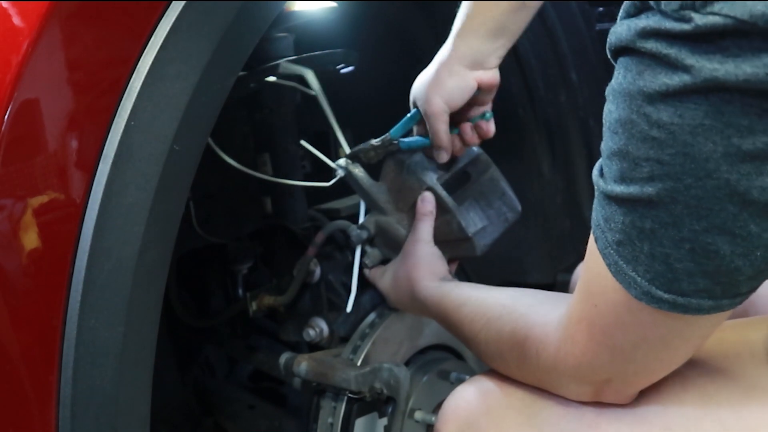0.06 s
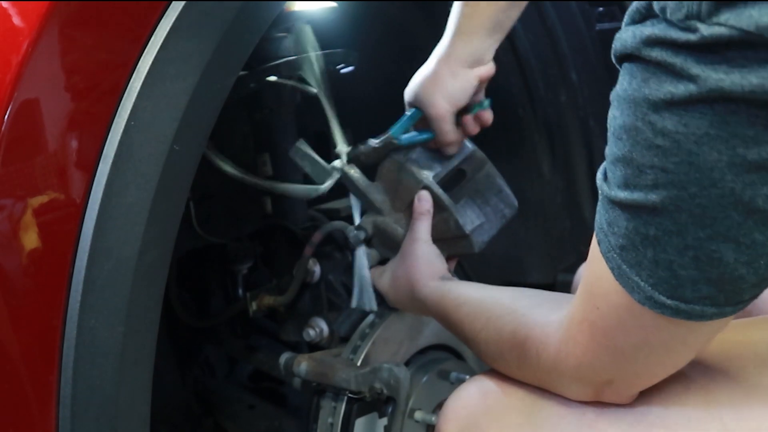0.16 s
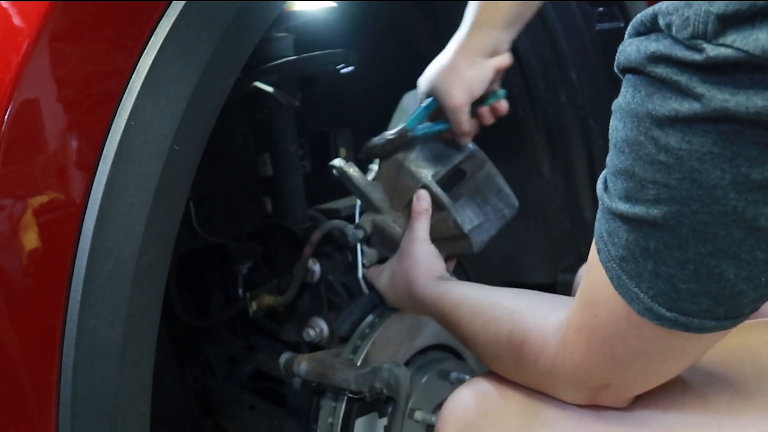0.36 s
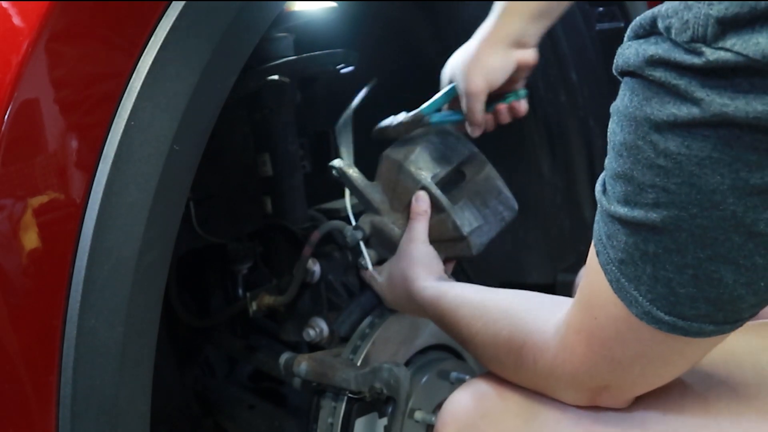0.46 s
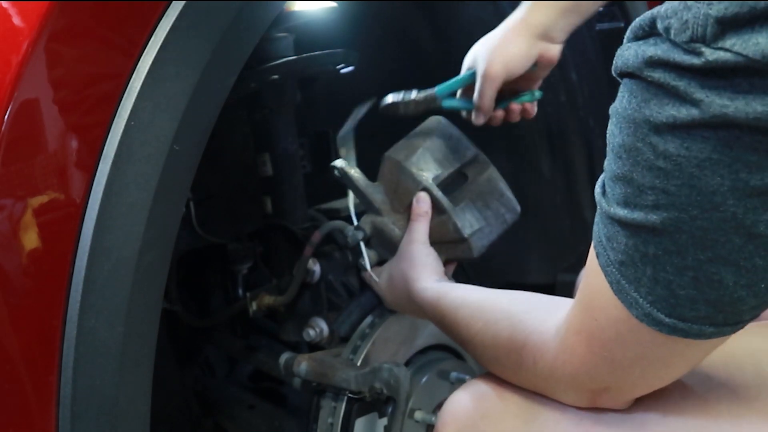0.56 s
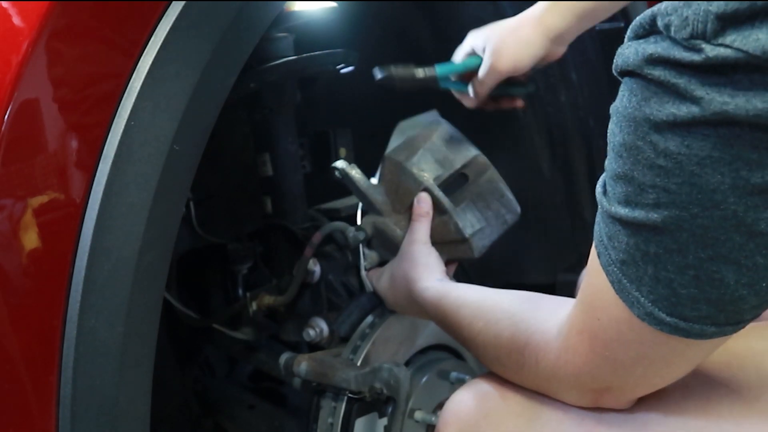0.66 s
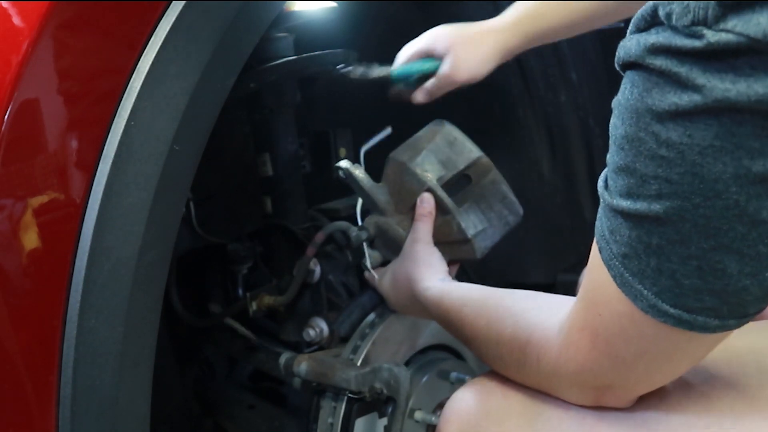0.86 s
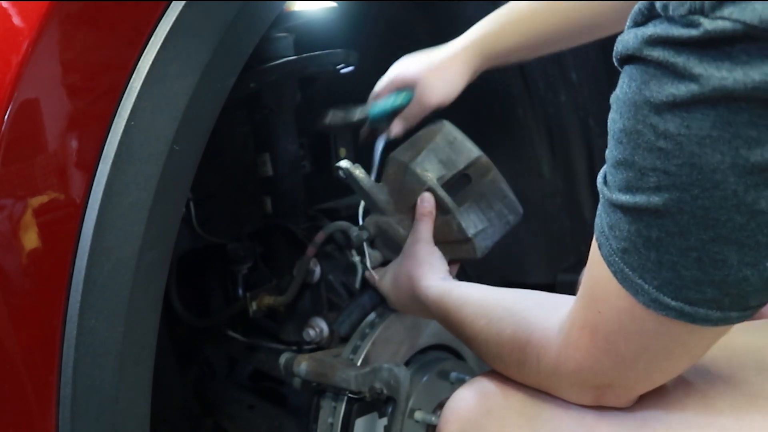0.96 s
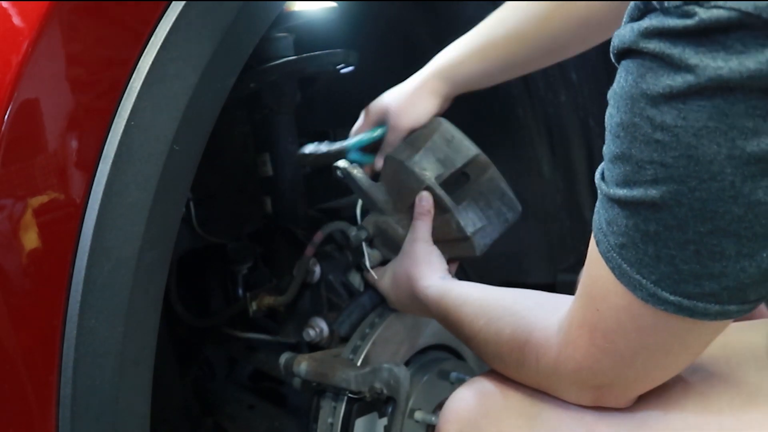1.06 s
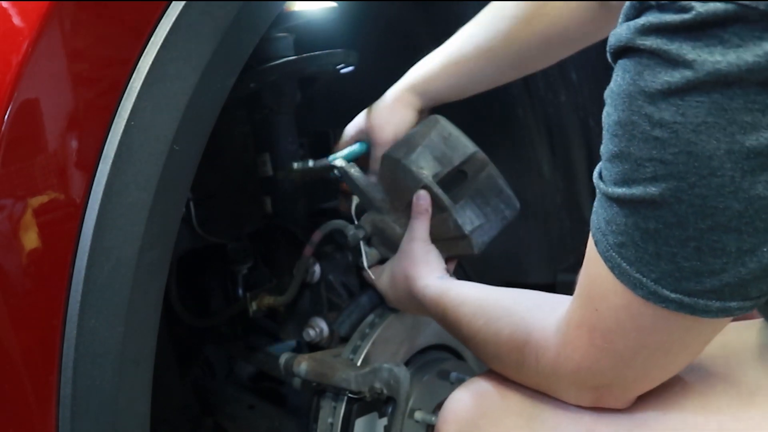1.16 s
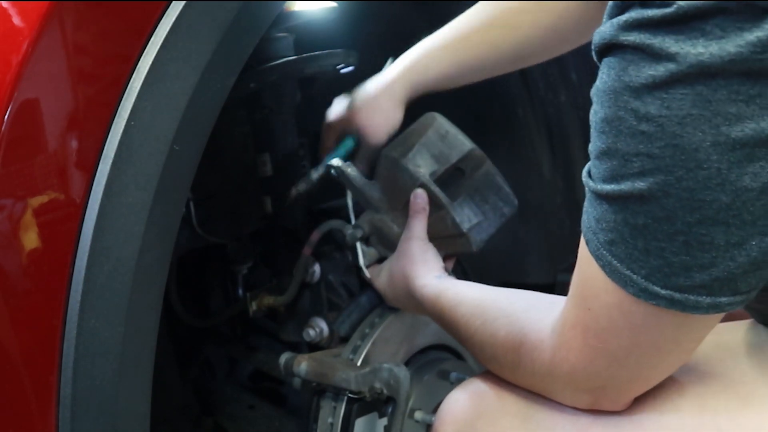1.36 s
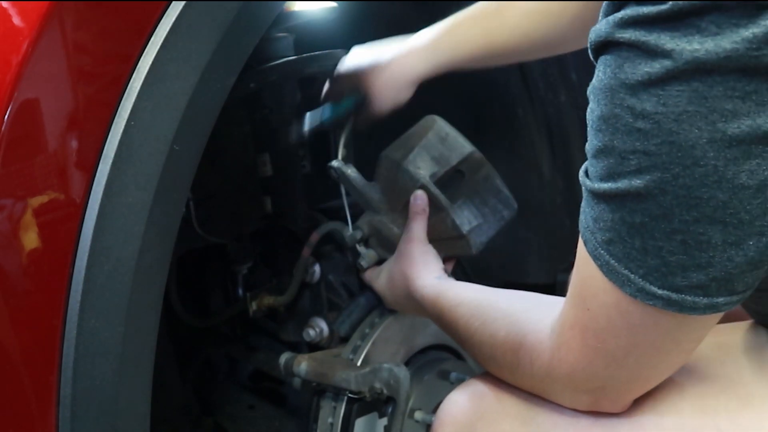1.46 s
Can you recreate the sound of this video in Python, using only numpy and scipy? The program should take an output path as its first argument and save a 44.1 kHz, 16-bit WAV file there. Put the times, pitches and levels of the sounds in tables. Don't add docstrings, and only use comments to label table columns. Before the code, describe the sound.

Close up in a garage wheel arch, a sharp steel snip rings out and fades, then a quieter slap on a plastic liner, faint clicks, a soft metal knock and light rubbing over low room air.

```python
import sys
import numpy as np
from scipy import signal
from scipy.fft import rfft, irfft
from scipy.io import wavfile
from scipy.ndimage import uniform_filter1d

SR = 44100
rng = np.random.default_rng(int(sys.argv[2]) if len(sys.argv) > 2 else 0)


def store_wav(level_fs):
    pcm = np.round(np.clip(np.atleast_2d(level_fs), -1, 1) * 32767)
    wavfile.write(sys.argv[1], SR, pcm.T.astype(np.int16))


def undo_db(level):
    steps = np.asarray(level, float) / 20
    return 10 ** steps


N = 66150

# frequency in Hz, level in dB.
AIR_COLOUR = [(20, -31), (60, -8.5), (125, -6.5), (300, -4.5), (600, -16.5), (1500, -20.5), (4000, -28.5),
              (16000, -47)]
# time in seconds, level in dB.
DRONE_LEVEL = [(0.0, -67), (0.102, -61), (0.174, -84.5), (0.229, -54.5), (0.262, -60.5), (0.384, -86.5),
               (0.458, -75), (0.504, -66), (0.63, -75), (0.688, -65.5), (1.229, -73.5), (1.306, -61.5),
               (1.466, -65.5), (1.5, -73.5)]
# time in seconds, level in dB.
RUB_LEVEL = [(0, -84.5), (.15, -81.5), (.2, -75.5), (0.501, -81.5), (.7, -84.5), (.95, -81), (1.079, -79),
             (1.12, -74.5), (1.17, -68), (1.2, -80.5), (1.3, -80), (1.5, -76)]
# frequency in Hz, level in dB.
RUB_COLOUR = [(900, -10), (3000, 2), (7000, -8.5), (12000, -5), (16000, -7.5)]
# start in seconds, level in dB, chatter
# fade in seconds.
SNIP = [
    (.2276, 3, .009),
    (.2292, -11, .03),
    (.2322, -13, .014),
    (.2405, -26, .03),
]
# frequency in Hz, level in dB.
SNIP_COLOUR = [(1000, -35), (1700, -16), (2150, 2), (2900, -11), (3700, -6), (7000, -9.5), (10000, -4.5),
               (16500, -7.5)]
# pitch in Hz, level in dB, fade in seconds.
JAW_MODES = [(2156, -3.5, 0.022), (2460, 1, 0.027), (3613, -3.5, 0.02), (5360, 0.5, 0.025),
             (5590, -4, 0.06), (7050, -10.5, 0.022), (8360, -2.5, 0.037), (9300, -6, 0.019),
             (9725, -6, 0.031), (10280, 1, .018), (10780, -3.5, 0.054), (13780, -2, 0.0083),
             (14200, -3.5, .022), (15680, -8.5, .025)]
# start in seconds, level in dB,
# pitch in Hz, fade in seconds.
PINGS = [(.2277, -15, 12800, .005), (.2277, -22, 16200, .012), (.228, -36, 320, .04),
         (.2558, -31, 2800, .005), (.24, -38, 2300, .3), (.24, -40, 2425, .3), (.24, -42, 5400, .25),
         (.24, -42, 5800, .2), (.4330, -24, 1620, .03), (.4395, -29, 1530, .07), (.4330, -33, 628, .08),
         (.434, -37, 395, .08), (.438, -48, 105, .25), (.436, -43, 4650, .05), (.797, -48, 555, .06),
         (.798, -48, 385, .08), (.803, -54, 680, .06), (.93, -74, 5500, .45), (.4332, -37, 1195, .07),
         (.4338, -33, 1840, .06), (.4345, -35, 2140, .07), (.4352, -32, 2550, .05),
         (.4365, -29, 2860, .045), (.4355, -33, 3250, .04), (.4345, -36, 3700, .06), (.466, -45, 750, .07),
         (.444, -40, 250, .09), (.475, -49, 350, .1), (.604, -61, 6300, .04), (.6045, -62, 8300, .04),
         (.801, -55, 9780, .03), (.802, -54, 11700, .025), (.8025, -52, 5790, .03), (.801, -46, 2580, .08),
         (.802, -50, 3335, .06), (.805, -48, 1455, .09), (.807, -47, 1960, .09), (.808, -48, 2930, .08),
         (1.15, -79, 3530, .2), (1.2855, -53, 2950, .04), (1.477, -68, 3450, .03), (1.477, -68, 3800, .03)]
# centre in seconds, level in dB, width in seconds.
PUFFS = [
    (0.2281, -22, 0.00032),
    (.256, -30.5, .00012),
]
# frequency in Hz, level in dB.
WASH_COLOUR = [(1700, -23.5), (2300, -0.5), (2900, -6.5), (4800, -10), (5650, -5), (6500, -13),
               (10000, -10.5), (16000, -16)]
# frequency in Hz, fade in seconds.
WASH_FADE = [(2100, .35), (5500, .36), (10000, .31), (15000, 0.25)]
# start in seconds, level in dB, chatter fade in seconds.
SLAP = [
    (.4328, -21, 0.034),
    (.4358, -16.5, 0.013),
    (.4383, -24.5, 0.015),
    (.44, -33, 0.3),
    (.447, -60, 0.047),
    (.469, -51, 0.014),
]
# frequency in Hz, level in dB.
SLAP_COLOUR = [(40, -55), (110, -16), (250, -11), (1200, -5), (3400, -2.5), (5500, -12.5), (9000, -20.5),
               (16000, -34)]
# pitch in Hz, level in dB, fade in seconds.
LINER_MODES = [(257, -11, 0.12), (388, 7, 0.076), (664, -15, 0.094), (1190, -4, 0.031),
               (1646, -12.5, 0.027), (1848, 4, 0.15), (2146, -6, 0.055), (2550, -14, 0.094),
               (2820, -7, 0.048), (3200, -3, 0.072), (3680, -8, 0.082), (4400, -15, 0.076),
               (4600, -19, 0.077)]
# frequency in Hz, fade in seconds.
GARAGE_FADE = [(200, 0.2), (800, 0.66), (2100, 0.35), (5500, 0.26), (15000, 0.047)]
# start in seconds, level in dB, chatter fade in seconds, ring pitch in Hz,
# ring share in dB.
TICKS = [(0.492, -45.5, 0.038, 8000, -7), (0.598, -58.5, 0.038, 4600, -2), (0.603, -61, 0.084, 3180, 7),
         (0.623, -60.5, 0.14, 3080, -3.5), (.675, -70, 0.05, 3500, 3), (.749, -64.5, 0.066, 2700, 8),
         (0.855, -55.5, 0.07, 3550, -22), (0.894, -52, 0.07, 3720, -29.5), (0.9191, -60, 0.026, 9700, -5),
         (0.922, -54, 0.1, 3950, -1.5), (0.95, -65, 0.047, 5400, -1), (1.0097, -57, 0.059, 2784, -5.5),
         (1.066, -64.5, 0.073, 3080, -9), (1.23, -71, 0.061, 2720, 4.5), (1.264, -67, 0.045, 3000, 5),
         (1.274, -69.5, 0.13, 2950, 14), (1.2842, -56.5, 0.051, 3240, 7.5), (1.304, -59.5, 0.12, 3270, -2),
         (1.439, -60.5, 0.033, 3880, -14.5)]
# frequency in Hz, level in dB.
TICK_COLOUR = [(500, -6), (1500, -3.5), (3500, 6), (7000, -5), (16000, -8.5)]
# ratio to the ring pitch, level in dB.
TICK_OVERTONES = [(2.0, -20)]
# start in seconds, level in dB, chatter fade in seconds.
KNOCK = [
    (.7965, -35.5, 0.092),
    (.8035, -30.5, 0.058),
    (.81, -48.5, 0.44),
    (.8145, -39, 0.016),
    (.819, -42, 0.053),
]
# frequency in Hz, level in dB.
KNOCK_COLOUR = [(150, -44), (380, -2), (900, -11), (1500, -2), (3000, -0.5), (4800, -13), (8000, -18.5),
                (16000, -31)]
# pitch in Hz, level in dB, fade in seconds.
CASTING_MODES = [(375, 2, 0.028), (570, 0.5, 0.24), (1470, -9, 0.07), (1990, 2, 0.034), (2450, -7, 0.046),
                 (2620, 2, 0.077), (2830, -13, 0.11), (3300, -12, 0.095), (3780, -10, 0.027)]


def rms_one(x):
    return x / np.sqrt(np.mean(x ** 2) + 1e-20)


def at_hz(points, hz):
    table = np.array(points)
    return np.interp(np.log(hz), np.log(table[:, 0]), table[:, 1])


def bands(x):
    edges = 22 * 2 ** np.arange(0, 9.7, 1 / 3)
    x = np.atleast_2d(x) + 1e-18
    for k, (low, high) in enumerate(zip(edges, edges[1:])):
        band_filter = signal.butter(2, [low, high], "band", fs=SR, output="sos")
        yield np.sqrt(low * high), signal.sosfilt(band_filter, x[k % len(x)])


def coloured(x, spectrum):
    size = 2 ** 13
    log_gain = at_hz(spectrum, np.fft.rfftfreq(size, 1 / SR) + 1) * np.log(10) / 20
    cepstrum = irfft(log_gain)
    cepstrum[1:size // 2] *= 2
    cepstrum[size // 2 + 1:] = 0
    response = irfft(np.exp(rfft(cepstrum)))
    return signal.fftconvolve(x, response)[:len(x)]


def ring(x, hz, t60):
    r = undo_db(-60 / (t60 * SR))
    feedback = [1, -2 * r * np.cos(2 * np.pi * hz / SR), r * r]
    return signal.lfilter([(1 - r * r) / 2, 0, (r * r - 1) / 2], feedback, x + 1e-18)


def drift(rate_hz):
    r = np.exp(-2 * np.pi * rate_hz / SR)
    wander = signal.lfilter([1], [1, -2 * r, r * r], rng.standard_normal(N + SR))
    return rms_one(wander[SR:])


def grit():
    contacts_per_s, spread_db = 15000, 1.5
    sizes = undo_db(spread_db * np.minimum(rng.exponential(1, N), 4)) * rng.choice([-1, 1], N)
    contacts = sizes * (rng.random(N) < contacts_per_s / SR)
    return rms_one(contacts + 1.3 * rng.standard_normal(N))


def dying(s, db, t60):
    t = np.arange(N) / SR - s
    return undo_db(db - 60 * np.maximum(t, 0) / t60) * np.clip(t / 0.0002, 0, 1)


def struck(hits, colour, modes, ring_db):
    force = grit() * sum(dying(*hit) for hit in hits)
    rings = 0
    for k, (hz, db, t60) in enumerate(modes):
        rings = rings + (-1) ** k * undo_db(db) * ring(force, hz, t60)
    return coloured(force, colour) + undo_db(ring_db) * rings


def background():
    air_db, drone_hz, drone_width_hz = -65, 197.56, 5
    air = rms_one(coloured(rng.standard_normal(N + SR), AIR_COLOUR)[SR:])
    air = undo_db(air_db + 1.1 * drift(24)) * air
    pitch = drone_hz + drone_width_hz * drift(7.7)
    drone = np.sqrt(2) * np.sin(2 * np.pi * np.cumsum(pitch) / SR)
    s, db = np.transpose(DRONE_LEVEL)
    return air + undo_db(np.interp(np.arange(N) / SR, s, db)) * drone


def rubbing():
    s, db = np.transpose(RUB_LEVEL)
    hiss = rms_one(coloured(rng.standard_normal(N), [(300, -40.0)] + RUB_COLOUR))
    return undo_db(np.interp(np.arange(N) / SR, s, db) + 1.2 * drift(20)) * hiss


def jaws():
    struck_db = -15.5
    s, t = SNIP[0][0], np.arange(N) / SR
    free = 0
    for k, (hz, db, t60) in enumerate(JAW_MODES):
        free = free + (-1) ** k * dying(s, db + struck_db, t60) * np.sin(2 * np.pi * hz * (t - s))
    return free + struck(SNIP, SNIP_COLOUR, JAW_MODES, ring_db=-4)


def pings():
    t, rough = np.arange(N) / SR, undo_db(2.5 * drift(60))
    return rough * sum(dying(s, db, t60) * np.sin(2 * np.pi * hz * (t - s)) for s, db, hz, t60 in PINGS)


def puffs():
    t = np.arange(N) / SR
    return -sum(undo_db(db) * np.exp(-((t - s) / width) ** 2) for s, db, width in PUFFS)


def cut_echo():
    start_s, level_db = 0.231, -32
    noise = [coloured(white, WASH_COLOUR) for white in rng.standard_normal((2, N))]
    wash = 0
    for hz, band in bands(rms_one(np.array(noise))):
        if hz > 1000:
            wash = wash + band * dying(start_s, level_db, at_hz(WASH_FADE, hz))
    return wash


def slap():
    return struck(SLAP, SLAP_COLOUR, LINER_MODES, ring_db=1)


def garage(x):
    level_db, rise_s = -15, 0.0068
    t = np.arange(N // 2) / SR
    noise = rng.standard_normal((2, N // 2))
    tail = sum(band * undo_db(-60 * t / at_hz(GARAGE_FADE, hz)) for hz, band in bands(noise))
    tail = tail * (1 - np.exp(-t / rise_s))
    return undo_db(level_db) * signal.fftconvolve(x, tail / np.sqrt(np.sum(tail ** 2)))[:N]


def ticks():
    ring_t60_s = 0.007
    scuff, rings, contacts = 0, 0, grit()
    for s, db, t60, hz, ring_db in TICKS:
        force = contacts * dying(s, db, t60)
        scuff = scuff + force
        for ratio, part_db in [(0.95, 0.0059)] + TICK_OVERTONES:
            note = ring(force, min(hz * ratio, 16000), ring_t60_s)
            rings = rings + undo_db(ring_db + part_db + 10) * note
    return coloured(scuff, TICK_COLOUR) + rings


def knock():
    return struck(KNOCK, KNOCK_COLOUR, CASTING_MODES, ring_db=1)


def scene():
    work = slap() + ticks() + knock()
    cut = jaws() + pings() + puffs() + cut_echo()
    return (background() + rubbing() + cut + work + garage(work))[None]


def low_pass(x):
    return signal.sosfilt(signal.butter(12, 16670, fs=SR, output="sos"), x)


def record(dry):
    x = signal.sosfilt(signal.cheby2(12, 70, 16900, fs=SR, output="sos"), dry)
    top_filter = signal.ellip(10, 0.1, 60, 15800, "high", fs=SR, output="sos")
    top = signal.sosfiltfilt(top_filter, x)
    loud = uniform_filter1d(np.abs(top), size=256) > undo_db(-52)
    is_open = uniform_filter1d(loud * 1.0, size=768) > 0
    x = x - top * (1 - uniform_filter1d(is_open * 1.0, size=256))
    return low_pass(np.clip(x, -1, 1))


dry = scene()
out = record(dry)
store_wav(out)
```